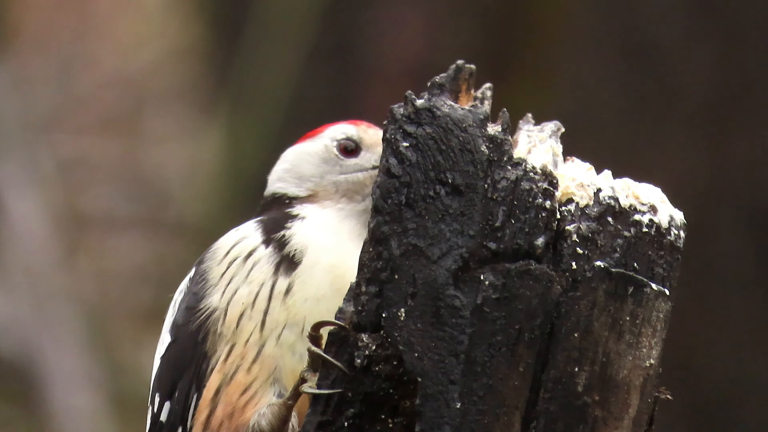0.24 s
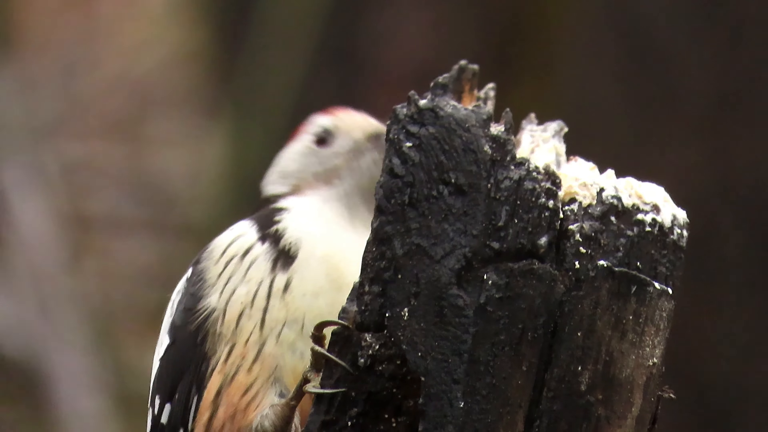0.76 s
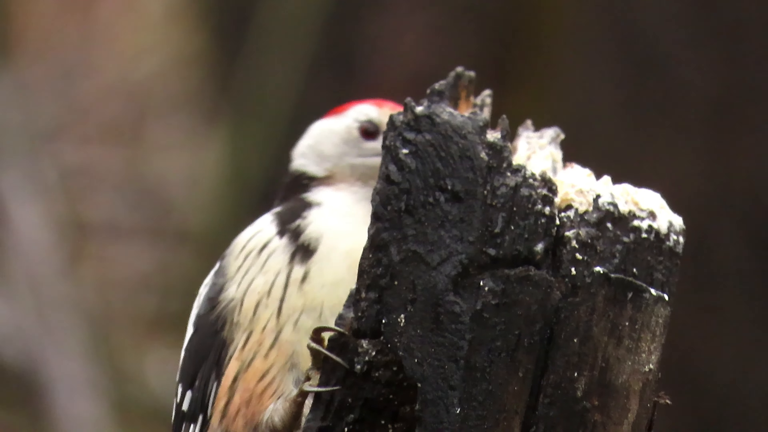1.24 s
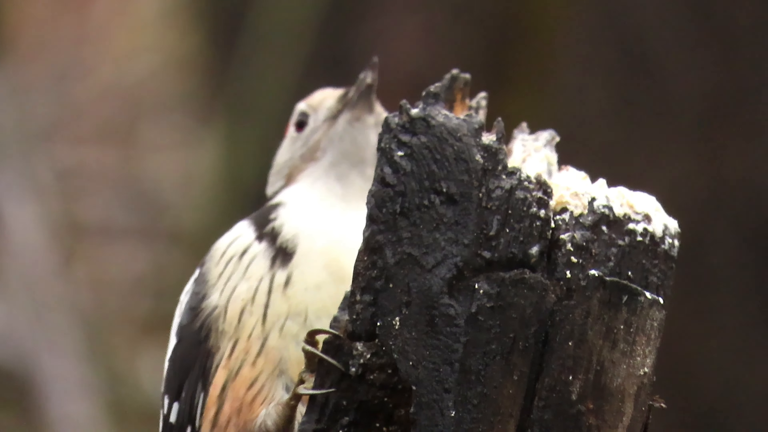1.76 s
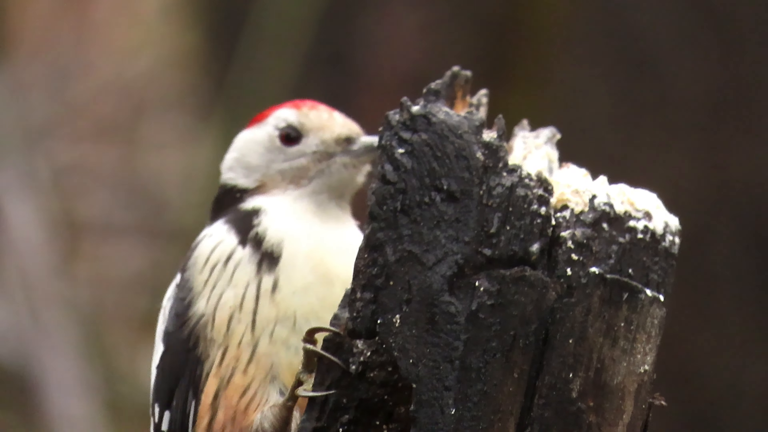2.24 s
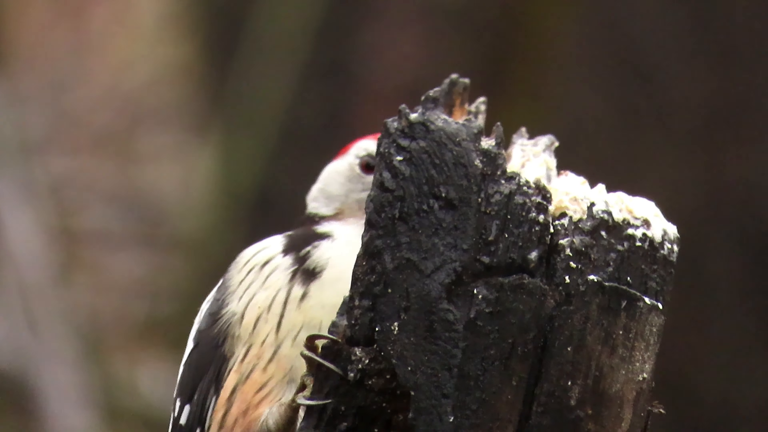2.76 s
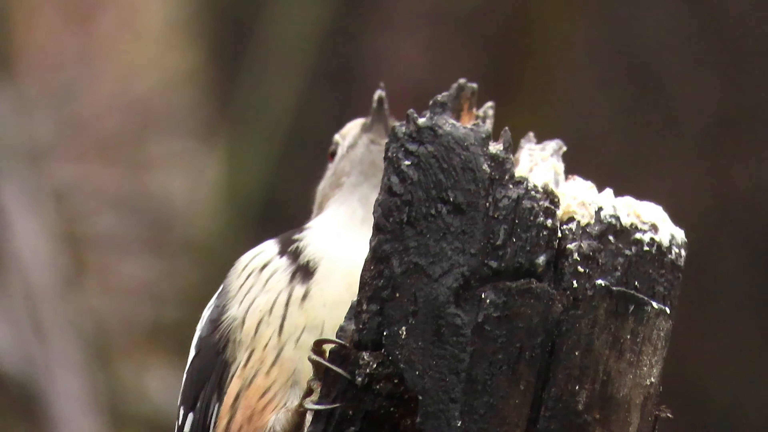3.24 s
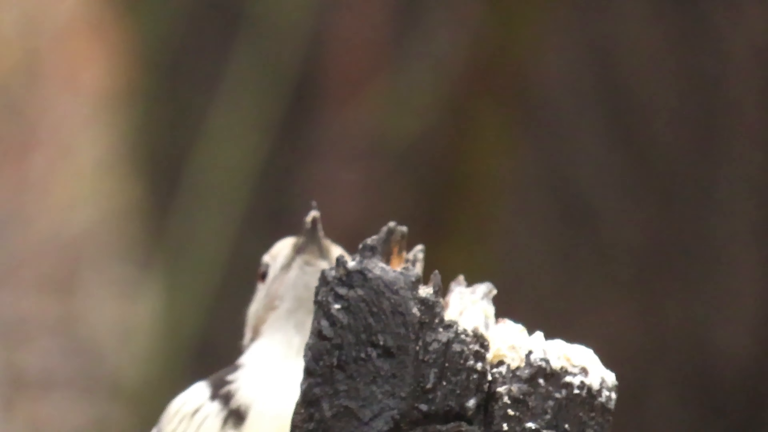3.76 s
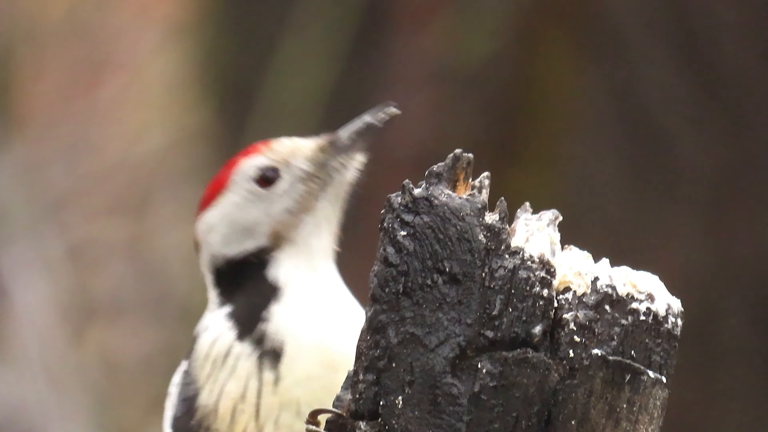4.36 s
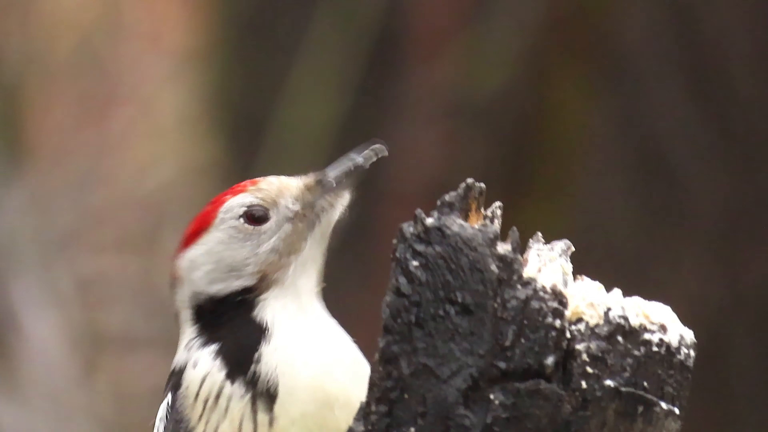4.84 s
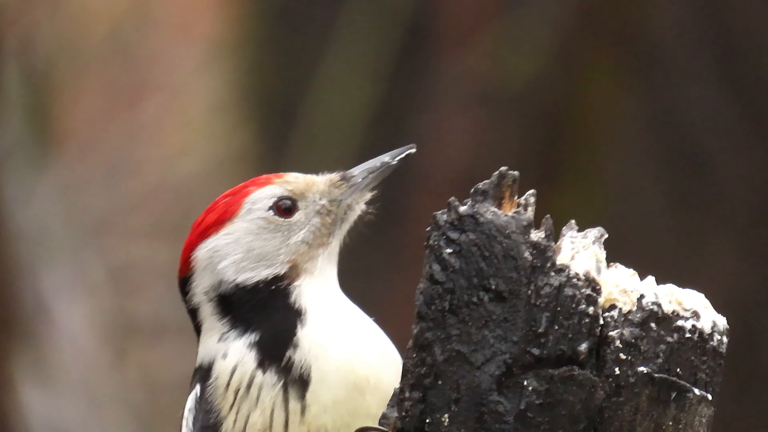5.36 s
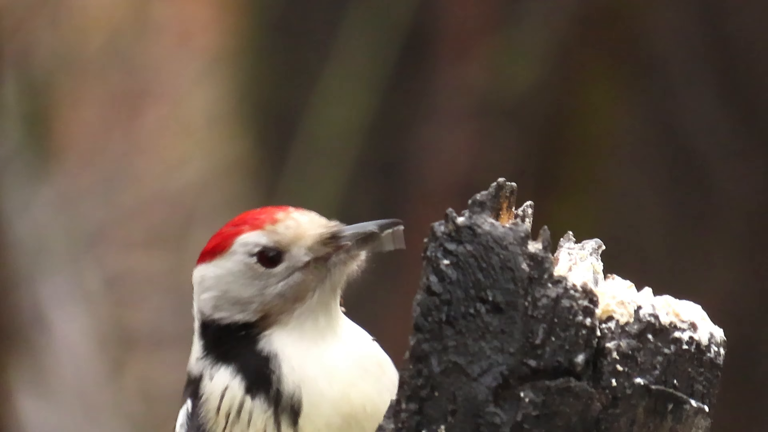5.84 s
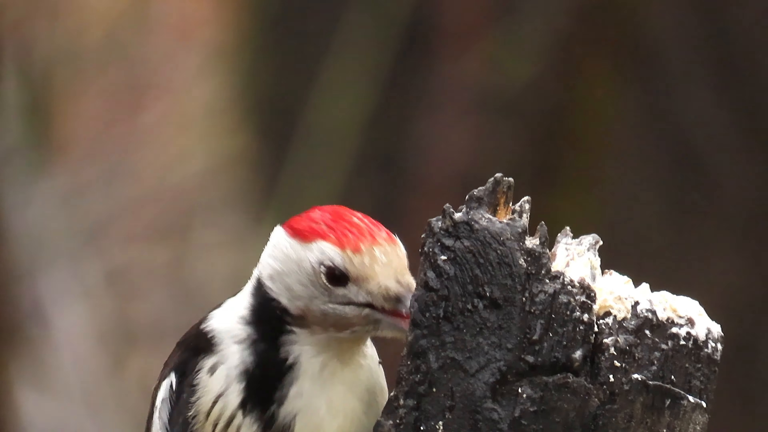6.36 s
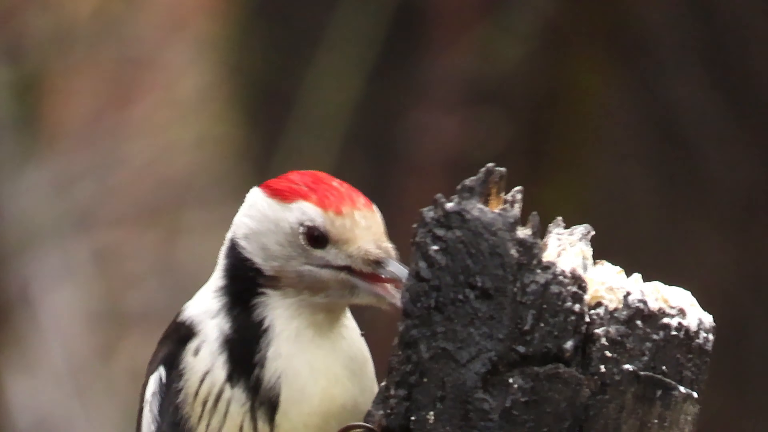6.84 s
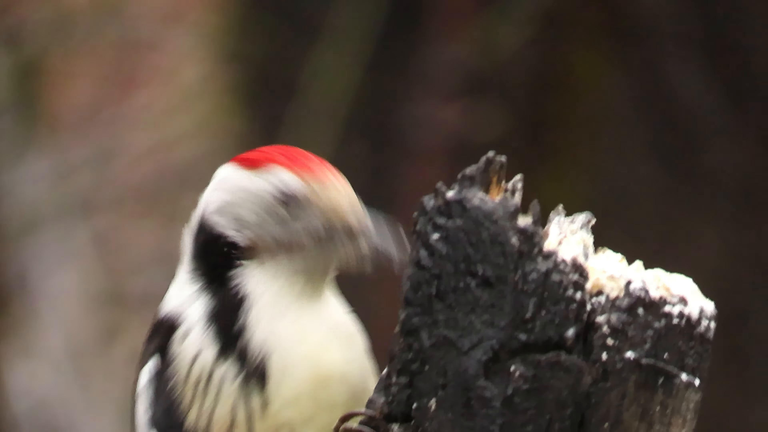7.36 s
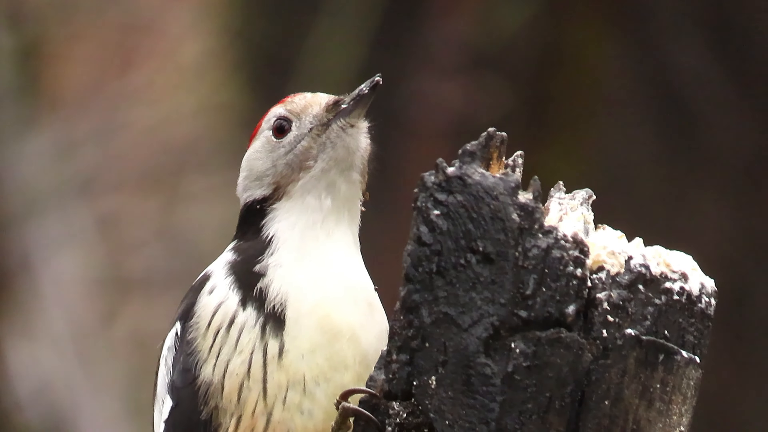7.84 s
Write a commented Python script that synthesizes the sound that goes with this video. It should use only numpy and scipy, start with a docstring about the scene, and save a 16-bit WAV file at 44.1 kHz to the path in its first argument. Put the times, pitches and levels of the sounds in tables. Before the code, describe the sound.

Outdoors in calm woodland, a close woodpecker repeats short, piercing nasal squeaks in a regular chain for about three seconds, bright and slightly clipped, each closing with a brief creak after the first few. A faint scattered echo lingers among the trunks. Afterwards only airy stereo hiss, soft distant rumble, a dry tick, blurred far bird cries, little gliding whistles and dull low swells remain.

```python
"""A woodpecker close by calls fifteen times in quiet woodland; its loud notes overload the recorder.
Each call is a rising nasal note, a leap to a drooping whistle and a drop to a short creak, all built
from harmonics shaped by a throat. The eighth call cracks to the octave.
The trees ring faintly (sparse random echoes), a small bird whistles far off (gliding tones), and
blurred far sounds, one tiny snap, a far rumble and a soft hiss are shaped noise."""
import sys
import numpy as np
from scipy import signal
from scipy.fft import rfft, irfft, next_fast_len
from scipy.io import wavfile
from scipy.ndimage import uniform_filter1d

SR = 44100
rng = np.random.default_rng(int(sys.argv[2]) if len(sys.argv) > 2 else 0)


def dump(signal):
    """Clip the signal to [-1, 1] and save it as 16-bit WAV at the path in sys.argv[1]."""
    limited = np.clip(np.atleast_2d(signal).T, -1, 1)
    pcm = np.round(limited * 32767).astype(np.int16)
    wavfile.write(sys.argv[1], SR, pcm)


N = 356769


def amp(db):
    """Decibels to gain."""
    return 10 ** (np.asarray(db) / 20)


def unit(x):
    """Scales to rms 1."""
    return x / np.sqrt(np.mean(x ** 2) + 1e-20)


def read(points, hz):
    """Reads a table on a log-frequency axis."""
    f, value = np.transpose(points)
    return np.interp(np.log(hz + 1), np.log(f + 1), value)


def add(mix, s, sound):
    """Adds a sound to a track at time s."""
    part = mix[round(s * SR):][:len(sound)]
    part += sound[:len(part)]


def noise(shape, size):
    """Noise of rms 1 whose spectrum follows shape(Hz)."""
    spectrum = rfft(rng.standard_normal(size))
    return unit(irfft(spectrum * shape(np.fft.rfftfreq(size, 1 / SR)), size))


def waver(rate_hz, size):
    """Random wobble, mostly slower than rate_hz."""
    return noise(lambda f: 1 / (1 + (f / rate_hz) ** 4), size)


def gate(t, start, end, rise, fall):
    """Opens smoothly around start and shuts around end; fully open it passes 0.88."""
    return 0.22 * (1 + np.tanh((t - start) / rise)) * (1 + np.tanh((end - t) / fall))


def equalise(x, gain):
    """Filters both channels by gain(Hz)."""
    size = next_fast_len(N + 2048)
    return irfft(rfft(x, size) * gain(np.fft.rfftfreq(size, 1 / SR)), size)[:, :N]


# colour of the rumble and hiss: (frequency [Hz], relative level per Hz [dB])
AIR_COLOUR = [(15, -34), (25, -6), (64, 1), (184, -8), (324, -11.5), (604, -13.5), (1150, -15),
              (1250, -20.5), (1430, -18.5), (3580, -23.5), (3880, -23.5), (4950, -27), (6140, -32),
              (14200, -36.5), (15800, -34)]
# how wide they sound: (frequency [Hz], left-right difference against the shared part [dB])
AIR_WIDTH = [(60, -25), (110, -12), (200, -2.5), (380, 1), (700, -6), (1290, -5), (2380, -4), (4400, -0.5),
             (8120, 6), (15000, 0.5)]
# level of the hiss above 7.5 kHz, against its colour above: (time [s], level [dB])
HISS_LEVEL = [(0, 1), (3.9, 2.5), (4.8, 2), (5.0, 5), (5.4, 3), (5.55, 1.5), (7.0, 2), (7.7, -0.5)]
AIR_DB = -47.5


def air():
    """Far rumble, alike at both ears in the bass, and a soft hiss whose top is set by a slow level curve."""
    size = 2 ** 19
    mid = noise(lambda f: amp(read(AIR_COLOUR, f)), size)
    other = noise(lambda f: amp(read(AIR_COLOUR, f)), size)
    side = irfft(rfft(other) * amp(read(AIR_WIDTH, np.fft.rfftfreq(size, 1 / SR))))
    swell = amp(.5 * waver(0.89, size))
    both = amp(AIR_DB) * (swell * np.array([mid + side, mid - side]))[:, :N]
    high_pass = signal.butter(2, 7500, "high", fs=SR, output="sos")
    top = signal.sosfiltfilt(high_pass, both)
    top_db = np.interp(np.arange(N) / SR, *np.transpose(HISS_LEVEL))
    return both + top * (amp(top_db) - 1)


# hoarse far bird cries above and dull swells below:
# (start [s], length [s], centre [Hz], width [Hz], level before the gate [dB])
FAR_BANDS = [(0.199, 0.4, 1233, 139, -56), (1.0, 0.25, 1126, 45.3, -57), (2.959, 0.14, 1110, 60.8, -55.5),
             (4.089, 0.2, 1556, 90, -53), (4.496, 0.11, 2550, 149, -54.5), (6.899, 0.39, 1190, 180, -56),
             (6.534, .2, 120, 170, -47), (6.713, .14, 310, 161, -45), (7.579, 0.19, 292, 198, -48.5)]


def far_sounds():
    """Distance smears each sound into a soft band of noise."""
    out, t = np.zeros(N), np.arange(32768) / SR
    for start, length, hz, width, db in FAR_BANDS:
        band = noise(lambda f: np.exp(-2 * ((f - hz) / width) ** 2), len(t))
        add(out, start, amp(db) * band * gate(t, 0.031, length - .03, 0.012, 0.031))
    return out


# thin notes of a small far bird, before their wobble:
# (start [s], end [s], first pitch [Hz], middle pitch [Hz], last pitch [Hz], level [dB])
CHIRP_NOTES = [(5.835, 5.96, 5820, 4890, 3900, -49), (5.962, 6.039, 2305, 3550, 3800, -43.5),
               (6.598, 6.711, 5560, 4620, 4070, -56.5), (6.7, 6.756, 4000, 4870, 5370, -50.5)]


def small_bird():
    """Faint gliding whistles, frayed in pitch and level by the way through the trees."""
    out, t = np.zeros(N), np.arange(8192) / SR
    for start, end, first_hz, middle_hz, last_hz, db in CHIRP_NOTES:
        share = t / (end - start)
        glide = np.interp(share, [0, .5, 1], [first_hz, middle_hz, last_hz])
        hz = glide * (1 + 0.0293 * waver(300, len(t)))
        flutter = amp(3.5 * waver(72, len(t)))
        arch = np.sin(np.pi * np.clip(share, 0, 1))
        tone = np.sin(2 * np.pi * np.cumsum(hz) / SR)
        add(out, start, amp(db) * flutter * arch * tone)
    return out


TICK_S, TICK_DB, TICK_HZ = 4.8815, -33, 5000  # time, level before it dies away, start of the treble slope


def tick():
    """A tiny dry snap: a burst of noise that dies within a few milliseconds."""
    out, t = np.zeros(N), np.arange(512) / SR
    snap = noise(lambda f: f / np.hypot(f, 900) / np.hypot(1, f / TICK_HZ) / (1 + (f / 11000) ** 8), len(t))
    add(out, TICK_S, amp(TICK_DB) * snap * np.exp(-t / 0.00081))
    return out


# how long the trees ring: (frequency [Hz], time to sink by 60 dB, before the shaping below [s])
RING_TIME = [(500, 2), (1900, 6), (2800, 1.5), (6000, 1.9), (14000, 0.26)]
# how strongly the trees scatter: (frequency [Hz], relative level [dB])
SCATTER = [(1000, -7), (1900, 2), (2700, 9), (4000, 2), (12000, -7.5)]


def forest(x):
    """Scatter from many trunks, different at each ear; the band near 1900 Hz lingers longest."""
    size = 3 * SR
    hits = rng.random((2, size)) < 1500 / SR  # about 1500 echoes a second
    taps = rng.standard_normal((2, size)) * hits
    hz, t, z = signal.stft(taps, SR, nperseg=256)
    decay_db = read(SCATTER, hz)[:, None] - 60 * t / read(RING_TIME, hz)[:, None]
    tail = signal.istft(z * amp(decay_db), SR, nperseg=256)[1][:, :size]
    t = np.arange(size) / SR
    near_trunks = 2.6 * np.exp(-t / 0.13)
    far_stand = 0.49 * np.exp(-((t - .36) / 0.036) ** 2)  # a denser stand of trees answers late
    tail *= (1 - np.exp(-t / 0.0061)) * (1 + near_trunks + far_stand)
    return signal.fftconvolve(x[None], tail / np.linalg.norm(tail[0]), axes=1)[:, :N]


# echoes off the stump and the nearest trunks: (delay [s], level [dB])
NEAR_ECHOES = [(.0043, -54), (.0091, -23), (0.0158, -23), (.024, -32.5), (.037, -47)]


def at_microphones(x, lag_s, right_db):
    """The right channel hears the bird slightly later and stronger; near echoes follow."""
    size = next_fast_len(N + 4096)
    turn = -2j * np.pi * np.fft.rfftfreq(size, 1 / SR)  # times a delay, this shifts the sound later
    z = rfft(x, size) * (1 + sum(amp(db) * np.exp(turn * delay) for delay, db in NEAR_ECHOES))
    left = z * amp(-right_db / 2)
    right = z * np.exp(turn * lag_s) * amp(right_db / 2)
    return irfft(np.array([left, right]), size)[:, :N]


# throat and bill, before scaling by throat size: (frequency [Hz], level [dB])
THROAT_COLOUR = [(900, -34), (1300, -14.5), (1580, -9.5), (1720, -0.5), (1850, 0), (1950, -0.5), (2100, -7),
                 (2600, -4), (2900, -7), (3400, -26), (3850, -17), (4150, -11.5), (4700, -25.5),
                 (5600, -13.5), (7000, -30), (10000, -31), (16000, -37)]


def syrinx(hz, harmonics_db, throat_size, jitter, shimmer):
    """A slightly unsteady membrane; each harmonic swells as it slides through a throat resonance."""
    size = len(hz)
    hz = uniform_filter1d(hz, size=130)
    phase = 2 * np.pi * np.cumsum(hz * (1 + jitter * waver(410, size))) / SR
    tone = np.zeros(size)
    for k, db in enumerate(harmonics_db, 1):
        tone += amp(db + read(THROAT_COLOUR, k * hz * throat_size)) * np.sin(k * phase)
    return tone * (1 + shimmer * waver(490, size)) * amp(.5 * waver(55, size))


# harmonics of the low register, from the fundamental up: (level [dB])
NASAL_HARMONICS = [0, 0, -5, -16, -10, -5, -18]
NASAL_HZ, NASAL_SAG_HZ_PER_S = 1383, 40  # the nasal note sinks through the series
NASAL_DB, NASAL_GROW_DB_PER_S = -21.5, 0.98  # and grows louder
SCOOP, SCOOP_SHARE = 0.28, 0.1525  # it scoops up from this far below, over this share of its length
LIFT = 0.119  # and rises by this much more towards the leap
NASAL_SWELL_DB, NASAL_EASE_DB = 4.5, -4.5  # its pressure builds with the scoop and eases with the lift


def nasal_note(t, length, since_s, throat_size):
    """The low register scoops up to its pitch, then strains towards the leap; returns tone and pressure."""
    share = np.clip(t / length, 0, 1)
    scoop, lift = np.exp(-share / SCOOP_SHARE), share ** 3
    hz = (NASAL_HZ - NASAL_SAG_HZ_PER_S * since_s) * (1 - SCOOP * scoop + LIFT * lift)
    db = NASAL_DB + NASAL_GROW_DB_PER_S * since_s - NASAL_SWELL_DB * scoop + NASAL_EASE_DB * lift
    pressure = amp(db) * gate(t, 0.00077, length, 0.00061, 0.0015)
    return syrinx(hz, NASAL_HARMONICS, throat_size, jitter=0.011, shimmer=0.052), pressure


def settle(pair, settled):
    """Slides from the first call's value (settled = 0) to the settled one (1)."""
    return np.interp(settled, [0, 1], pair)


# harmonics of the high register, from the fundamental up: (level [dB])
WHISTLE_HARMONICS = [1, -12, -15.5, -15.5, -38]
EVEN_DB_PER_OCTAVE = 61  # higher whistles carry stronger even harmonics
# each pair is (first call, settled)
TILT_HZ_PER_S = (1034, -400)  # drift of the whistle before the shoulder
DROOP_SHARE = (.2, 0.22)  # how far the whistle droops
DROOP_LEAD_S = (0.018, 0.0069)  # the droop is half done this long before the drop
DROOP_S = 0.0057  # softness of the bend into the droop
SHOULDER_S = 0.036  # the drift reaches the listed pitch this long before the drop
FADE_S, FADE_DB = 0.018, -3  # the pressure eases just before the drop


def whistle_note(t, hz, settled, throat_size):
    """The high register holds nearly level, then droops and fades into the drop at t = 0."""
    tilt, depth, lead = (settle(pair, settled) for pair in (TILT_HZ_PER_S, DROOP_SHARE, DROOP_LEAD_S))
    droop = .5 * (1 + np.tanh(.5 * (t + lead) / DROOP_S))
    pitch = (hz + tilt * np.minimum(t + SHOULDER_S, 0)) * (1 - depth * droop)
    is_even = np.arange(len(WHISTLE_HARMONICS)) % 2
    even_db = EVEN_DB_PER_OCTAVE * np.log2(hz / 2000) * is_even
    tone = syrinx(pitch, WHISTLE_HARMONICS + even_db, throat_size, jitter=.0028, shimmer=0.063)
    return tone * amp(np.interp(t, [-FADE_S, 0], [0, FADE_DB]))


# harmonics of the cracked note, from the fundamental up: (level [dB])
OCTAVE_HARMONICS = [1.5, 8.5, -14, -15, -18]
CRACK_FROM_S, CRACK_TO_S = 2.247, 2.309
CRACK_HZ, CRACK_DB = 2717, -15.5  # middle values; the note bends slightly around them


def octave(t):
    """The cracked note: the voice sticks an octave above the nasal pitch, swelling and nearly level."""
    times = np.linspace(CRACK_FROM_S, CRACK_TO_S, 5)
    hz = CRACK_HZ * np.interp(t, times, [.985, .998, 1.003, 1.006, .985])
    db = CRACK_DB + np.interp(t, times, [-1.9, -1.1, 0.74, -1.3, -0.5])
    tone = syrinx(hz, OCTAVE_HARMONICS, 0.938, jitter=0.0051, shimmer=0.025)
    return tone * amp(db) * gate(t, CRACK_FROM_S, CRACK_TO_S, 0.0011, 0.00086)


CREAK_S = .017  # length of the closing creak
CREAK_DB = (-40, -26)  # level as it starts: (first call, settled)


def creak_note(t, settled, throat_size):
    """The low register sinks and dies away from the drop at t = 0; returns tone and pressure."""
    sinking = np.interp(t, CREAK_S * np.array([0, .55, 1]), [1330, 1170, 880])
    tone = syrinx(sinking, NASAL_HARMONICS, throat_size, jitter=0.017, shimmer=0.17)
    db = settle(CREAK_DB, settled) - 280 * np.clip(t, 0, 1)  # falls 280 dB a second
    return tone, amp(db) * gate(t, 0, CREAK_S, 0.00058, .0015)


BREAK_DB = (-40.5, -33)  # rasp at the breaks of register: (first call, settled)


def breath_rasp(t, leap, settled, pressure):
    """Throat-coloured noise that follows the low register's pressure and bursts at the start and the leap."""
    breaks = sum(np.exp(-((t - s) / 0.0042) ** 2) for s in (0.0032, leap))
    breaks = breaks * amp(settle(BREAK_DB, settled))
    return noise(lambda f: amp(read(THROAT_COLOUR, f)), len(t)) * (amp(-25.0) * pressure + breaks)


CATCH_HZ, CATCH_DB, CATCH_S = 1860, -29.5, 0.0031  # pitch, peak level and half-width of the catch


def opening_catch(t):
    """Each call opens with a brief catch in the high register: a short pure tone."""
    return amp(CATCH_DB) * np.sin(2 * np.pi * CATCH_HZ * t) * np.exp(-((t - .0035) / CATCH_S) ** 2)


# one row a call; the series slows and on the whole sinks in pitch as it grows louder:
# (start [s], nasal note length [s], whistle length [s], whistle pitch before drift and droop [Hz],
#  whistle level before throat and gate [dB])
CALLS = [(.789, 0.049, 0.063, 2095, -17), (.983, 0.029, .081, 2134, -15.5), (1.18, .024, 0.085, 2123, -15),
         (1.380, 0.029, 0.082, 2070, -15.5), (1.583, 0.031, 0.08, 2004, -14),
         (1.788, 0.033, 0.076, 1982, -14.5), (1.995, 0.036, .072, 1965, -13.5),
         (2.206, 0.043, 0.072, 1917, -13), (2.42, .042, 0.063, 1903, -14), (2.639, .046, .062, 1910, -14),
         (2.862, .044, .064, 1904, -14), (3.088, .046, 0.062, 1916, -13.5),
         (3.312, 0.043, 0.058, 1900, -14.5), (3.541, .045, .050, 1855, -14),
         (3.758, .044, 0.049, 1833, -14.5)]
WARM_UP_S = 1.65  # the voice settles over the first calls
THROAT_HZ, THROAT_FOLLOW = 2022, 0.44  # the throat widens for calls below this pitch, by this power of the ratio


def call(row):
    """Nasal climb, leap to the whistle, droop and closing creak, with rasp at the start and the leap."""
    start, nasal_s, whistle_s, whistle_hz, whistle_db = row
    drop = nasal_s + whistle_s
    t = np.arange(8192) / SR - .005  # seconds from the start of the call
    since_s = start - CALLS[0][0]
    settled = min(since_s / WARM_UP_S, 1)
    throat_size = (THROAT_HZ / whistle_hz) ** THROAT_FOLLOW
    cracked = start < CRACK_FROM_S < start + drop

    nasal, pressure = nasal_note(t, nasal_s, since_s, throat_size)
    whistle = whistle_note(t - drop, whistle_hz, settled, throat_size)
    whistle_from = CRACK_TO_S - start if cracked else nasal_s  # the whistle waits for the crack to end
    whistle *= amp(whistle_db) * gate(t, whistle_from + 0.0016, drop, 0.0014, 0.0027)
    creak, ebb = creak_note(t - drop, settled, throat_size)
    rasp = breath_rasp(t, nasal_s, settled, pressure + ebb)
    sound = opening_catch(t) + nasal * pressure + whistle + creak * ebb + rasp
    if cracked:
        sound = sound + octave(start + t)
    return start + t[0], sound


def scene():
    """The rumble and hiss, the far birds, the snap, the trees and the near woodpecker."""
    bird = np.zeros(N)
    for row in CALLS:
        add(bird, *call(row))
    chirps = small_bird()
    near = at_microphones(bird, lag_s=.000056, right_db=2.5)
    ringing = forest(amp(-30.3) * bird + amp(-8) * chirps)
    return near + ringing + chirps + far_sounds() + tick() + air()


# recorder colour after the overload: (frequency [Hz], level [dB])
RECORDER_TREBLE = [(3000, 1), (5600, 0.5), (9500, 5), (13500, 6)]
EDGE_HZ = 15900  # top of the recorder's band


def record(dry, ceiling_db=-17.0):
    """Each channel flattens the loud whistles before a treble lift, adding bright odd harmonics; then the band limit."""
    dull = equalise(dry, lambda f: amp(-read(RECORDER_TREBLE, f)))  # the lift makes up for dull microphones
    fine = signal.resample_poly(dull, 4, 1, axis=1)  # flattened at four times the rate to limit aliasing
    fine = fine / (1 + abs(fine / amp(ceiling_db)) ** 40) ** (1 / 40)
    clipped = signal.resample_poly(fine, 1, 4, axis=1)
    lifted = equalise(clipped, lambda f: amp(read(RECORDER_TREBLE, f)))
    low_pass = signal.firwin(511, EDGE_HZ, window=("kaiser", 9), fs=SR)
    return signal.oaconvolve(lifted, low_pass[None], "same")


dry = scene()
out = record(dry)
dump(out)
```